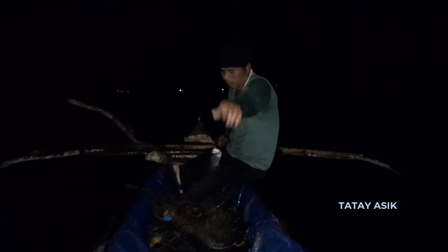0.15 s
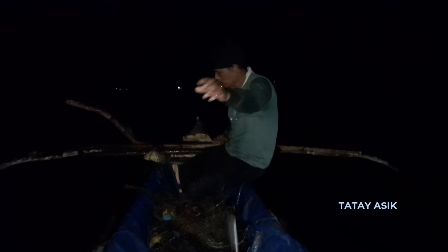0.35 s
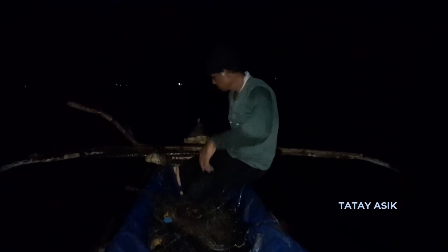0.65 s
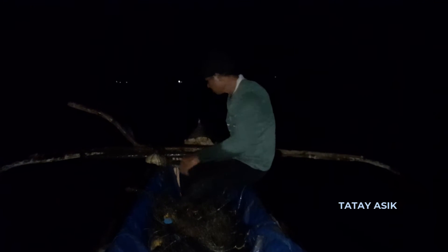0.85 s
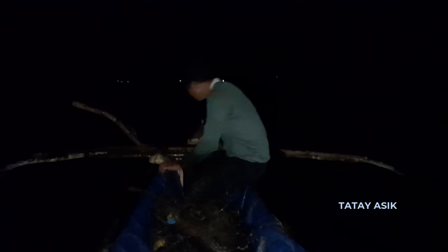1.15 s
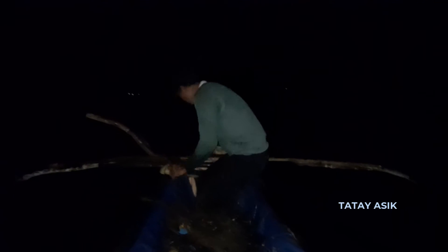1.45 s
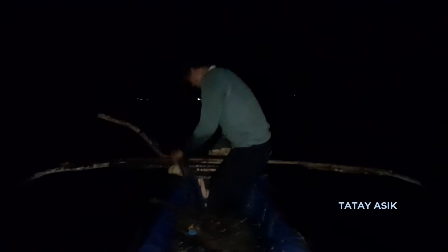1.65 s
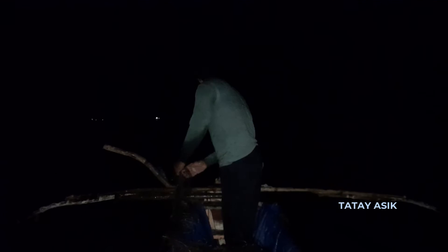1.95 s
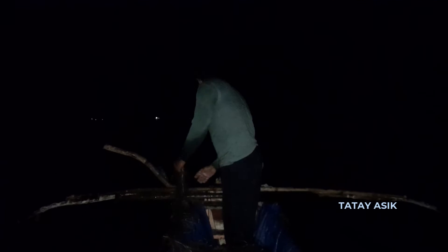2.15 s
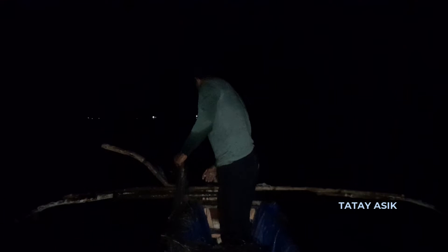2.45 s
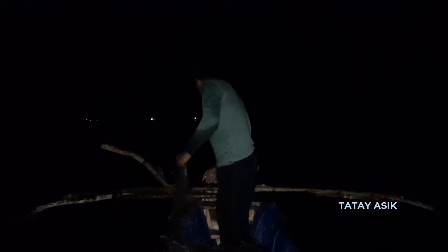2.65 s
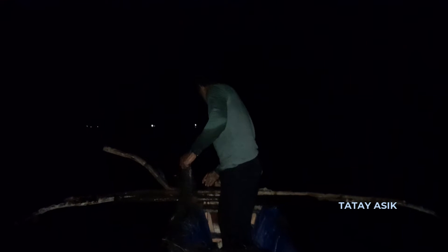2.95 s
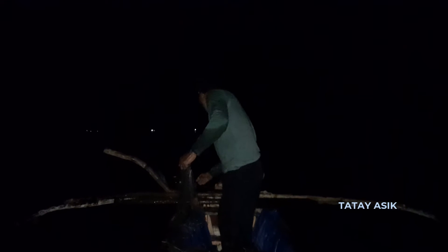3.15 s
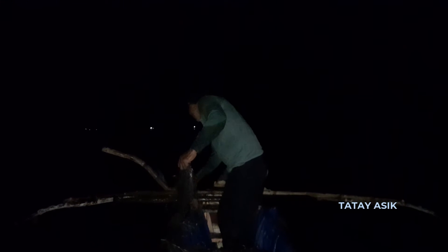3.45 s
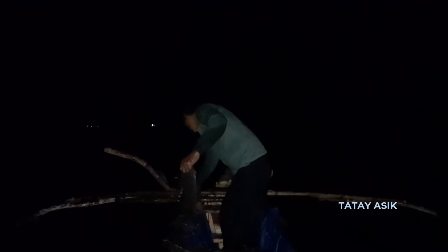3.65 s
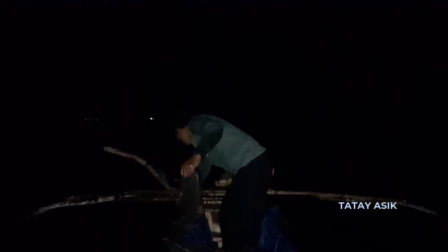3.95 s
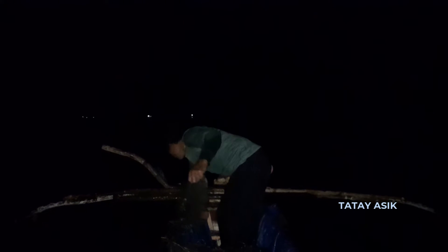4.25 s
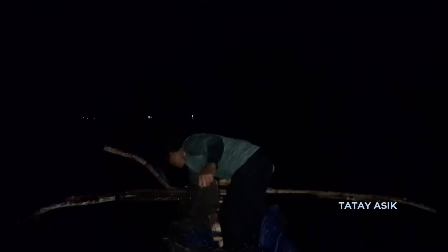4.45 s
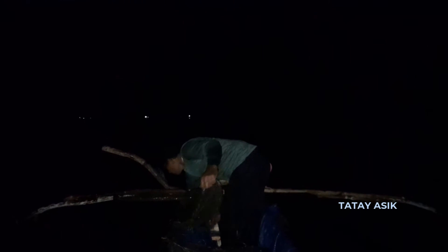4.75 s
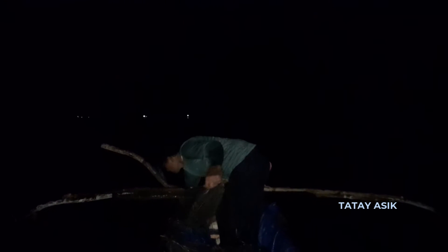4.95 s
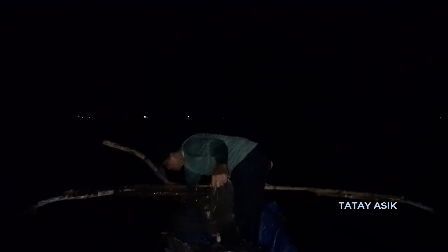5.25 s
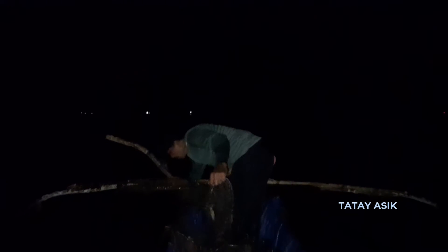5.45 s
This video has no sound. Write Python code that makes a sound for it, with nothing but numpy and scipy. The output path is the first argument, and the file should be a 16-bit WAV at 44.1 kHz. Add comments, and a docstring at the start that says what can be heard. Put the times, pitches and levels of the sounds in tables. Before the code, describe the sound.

A thrown object slaps the water early on, throwing spray and ringing bubbles, with a hard little knock on wood and a second slap soon after. Low breeze buffets the left side, then drops away. Drops tick on planks, a wet net slides faintly, and late waves slosh and gurgle against the hollow hull. Open outdoor sea, dry and near, with soft background noise.

```python
"""Small outrigger boat at night

Close on board, two microphone ports hear a splash: noise-burst slaps, low sine thumps, a rising plop, spray.
A wet net is drawn in: filtered patter hisses and short noise ticks drip on the planks.
Small waves slosh under the hull as patter whose colour shifts; small bubbles gurgle and the hull rings along.
At first a breeze, fluttering low noise, buffets mostly the left port; puffs and a faint rumble remain.
Behind it all lies the steady coloured noise of the open sea and microphone hiss."""
import sys
import numpy as np
from scipy import signal
from scipy.fft import rfft, irfft
from scipy.io import wavfile
from scipy.ndimage import uniform_filter1d

SR = 44100
rng = np.random.default_rng(int(sys.argv[2]) if len(sys.argv) > 2 else 0)


def inscribe(sig):
    """Save sig as 16-bit PCM at rate SR to the path in sys.argv[1].

    A 1-D sig is mono; a 2-D sig holds one channel per row.
    Samples are clipped to [-1, 1] before scaling.
    """
    pcm = np.round(np.clip(np.atleast_2d(sig).T, -1, 1) * 32767)
    wavfile.write(sys.argv[1], SR, pcm.astype(np.int16))


N = 247401
TIME = np.arange(N) / SR


def undb(db):
    """Decibels to gain."""
    return 10 ** (np.asarray(db) / 20)


def unit(x):
    """Scale to rms 1."""
    return x / np.sqrt(np.mean(x ** 2))


def curves(table):
    """Each column of a table after the time, joined by straight lines."""
    s, *columns = np.transpose(table)
    return [np.interp(TIME, s, column) for column in columns]


def fade(t, t60):
    """Exponential decay by 60 dB in t60, both in the same unit."""
    return np.exp(-np.log(1000) * t / t60)


def pan(db):
    """Gains of the left and right channel for a left minus right difference in dB."""
    return undb(np.array([db, -db]).reshape(2, -1) / 2)


def add(out, s, x):
    """Mix x in at time s."""
    i = int(s * SR)
    out[..., i:i + x.shape[-1]] += x[..., :N - i]


def colour(x, points, tilt_db=0):
    """Minimum-phase filter through (frequency [Hz], level [dB]) points, tilted per octave, of unit power gain."""
    size = 8192
    hz, db = np.transpose(points)
    octave = np.log2(np.maximum(np.arange(size // 2 + 1) * SR / size, 1))
    below = np.maximum(np.log2(hz[0]) - octave, 0)
    above = np.maximum(octave - np.log2(hz[-1]), 0)
    curve_db = np.interp(octave, np.log2(hz), db)
    gain = unit(undb(curve_db + tilt_db * octave - 20 * (below + above)))
    # Folding the cepstrum forward makes the filter causal
    cepstrum = irfft(np.log(gain))
    cepstrum[1:size // 2] *= 2
    cepstrum[size // 2 + 1:] = 0
    impulse = irfft(np.exp(rfft(cepstrum)))
    return signal.fftconvolve(x, impulse)[:len(x)]


def band(x, hz, octaves):
    """Band-pass around a centre."""
    half = 2 ** (octaves / 2)
    edges = np.clip([hz / half, hz * half], 10, SR * .48)
    return signal.sosfilt(signal.butter(2, edges, "band", fs=SR, output="sos"), x)


def even(x, span_s):
    """Take the slow chance swells out of a noise."""
    return x / np.sqrt(uniform_filter1d(x ** 2, int(span_s * SR)) + 1e-12)


def swell(s, db, rise_s, fall_s):
    """Gain that grows to a crest at time s and dies away."""
    drop_db, roundness = 18.5, 1.43  # drop at the ends of rise and fall; 1 = pointed crest, 2 = round
    away = np.maximum((s - TIME) / rise_s, (TIME - s) / fall_s)
    return undb(db - np.minimum(drop_db * away ** roundness, 200))


def swells(table, rest_db=-120):
    """Joint gain of several swells over a resting level, summed as powers."""
    return np.sqrt(undb(rest_db) ** 2 + sum(swell(*row) ** 2 for row in table))


def patter(rate, spread_db):
    """Random tiny impacts per second; a few stand out, larger for a positive spread, smaller for a negative."""
    size = undb(spread_db * np.minimum(rng.exponential(size=N), 4))
    hits = rng.random(N) < rate / SR
    return unit(hits * size * rng.choice([-1, 1], N))


def fizz(low_hz, high_hz, count, spread_db, cycles):
    """A cloud of small bubbles, each with its own size, ringing a few cycles with a slight rise."""
    out = np.zeros(N)
    for when, place, luck in rng.random((count, 3)):
        hz = low_hz * (high_hz / low_hz) ** place
        turns = TIME[:int(cycles / hz * SR)] * hz
        size = undb(-spread_db * np.log(max(luck, np.exp(-4))))  # a few are much larger than the rest
        ring = np.sin(2 * np.pi * turns * (1 + 0.12 * turns / cycles)) * fade(turns, cycles)
        add(out, when * N / SR, size * np.sqrt(hz) * ring)
    return unit(out)


# Wet slaps, first of the thrown thing on the water, later of the net; body and longer tail, the tail level
# relative to the body: # (time [s], level [dB], t60 [s], tail level [dB], tail t60 [s], tilt [dB/octave])
SLAP_HITS = [(0.6728, -26, 0.01, -6, 0.14, 0.5), (0.6735, -38, 0.03, -21.5, 0.24, 5),
             (0.8659, -40.5, 0.042, -9, .12, -0.5), (0.9256, -42, 0.013, -11, 0.056, 6),
             (1.3519, -44.5, 0.036, -32, 0.04, -2), (1.3575, -44, 0.015, 6, 0.061, -5.5),
             (1.368, -36.5, 0.02, -12, 0.071, 1.5)]
# Spectrum of a slap: (frequency [Hz], level [dB])
SLAP_SPECTRUM = [(350, -3), (650, -4.5), (1100, -22.5), (1600, -6), (2400, -17), (3500, -17), (5300, -14),
                 (6700, -8.5), (8300, -18.5), (10000, -14.5), (13000, -17), (15500, -15.5)]


def slaps(peak_db=8, peak_t60=0.00041, scattered=0.75):
    """A hard first contact cracks the surface, then a sheet of fine spray scatters to both ports."""
    out, t = np.zeros((2, N)), TIME[:SR // 3]
    share = scattered * (1 - fade(t, 0.0048))  # share of power that differs between the ports
    for s, db, t60, tail_db, tail_t60, tilt_db in SLAP_HITS:
        crack = undb(peak_db) * fade(t, peak_t60)
        shape = crack + fade(t, t60) + undb(tail_db) * fade(t, tail_t60)
        common = np.sqrt(1 - share) * rng.standard_normal(len(t))
        noise = common + np.sqrt(share) * rng.standard_normal((2, len(t)))
        slap = np.array([colour(port * shape, SLAP_SPECTRUM, tilt_db) for port in noise])
        add(out, s, undb(db) * slap)
    return out


# Hollow thumps of pushed water: (time [s], pitch [Hz], level [dB])
WATER_THUMPS = [(0.6735, 660, -27.5), (0.677, 339, -21), (0.690, 307, -23.5), (0.692, 167, -23),
                (0.703, 93.3, -26), (0.834, 271.6, -37.5), (1.332, 183, -34), (1.366, 305, -40),
                (1.37, 183.6, -31.5)]


def thumps():
    """Large pockets of water and air swing a few times: decaying sines with a soft onset."""
    swell_cycles, t60_cycles = 0.62, 15.6
    out, t = np.zeros(N), TIME[:SR // 3]
    for s, hz, db in WATER_THUMPS:
        turns = hz * t
        shape = (1 - np.exp(-turns / swell_cycles)) * fade(turns, t60_cycles)
        add(out, s, undb(db) * shape * np.sin(2 * np.pi * turns))
    return out


def bubble(hz, db, t60, double_s, attack_s=.0006, waver=0.034, splash_db=-7, splash_t60=0.018):
    """A trapped bubble is born in a little splash and rings, its pitch climbing as it nears the surface."""
    t = TIME[:SR // 6]
    wobble = unit(band(rng.standard_normal(len(t)), 100, 1.6))
    pitch = hz * np.minimum(1 + (t / double_s) ** 2, 3) * (1 + waver * wobble)
    ring = np.sin(2 * np.pi * np.cumsum(pitch) / SR) * fade(t, t60) * (1 - np.exp(-t / attack_s))
    splash = unit(band(rng.standard_normal(len(t)), hz, 0.98)) * fade(t, splash_t60)
    # Left minus right within the water layer: small bubbles sound further right
    side_db = 2 - 2.5 * np.log2(hz / 1000)
    return undb(db) * pan(side_db) * (ring + undb(splash_db) * splash)


# The cavity closes in a deep plop, and its remnant whoops upward:
# (time [s], pitch at birth [Hz], level [dB], t60 [s], time for the pitch to double [s])
CAVITY_PLOPS = [(0.8369, 537, -18.5, .026, 0.056), (0.857, 608, -37.5, .15, .025)]
# Drops that trap a ringing air bubble: (time [s], pitch at birth [Hz], level [dB], t60 [s])
DROP_BUBBLES = [(0.7618, 4630, -36.5, .017), (0.799, 2250, -30, .016), (0.8069, 1760, -33, 0.022),
                (0.809, 2500, -32, 0.021), (0.8377, 1025, -34, 0.082), (0.8525, 2590, -27.5, 0.023),
                (0.862, 1723, -28.5, 0.049), (0.885, 3040, -28.5, 0.0055), (0.8911, 1620, -32, 0.042),
                (0.924, 2070, -30.5, 0.026), (0.979, 1600, -36, 0.032), (0.996, 2940, -28.5, 0.017),
                (1.022, 4980, -37.5, 0.012), (1.047, 1148, -53.5, 0.2), (1.103, 1200, -37.5, 0.01),
                (1.149, 1350, -47, 0.037), (1.199, 2510, -42.5, 0.017), (1.239, 1500, -39, 0.039),
                (1.3126, 2600, -47.5, 0.051), (1.3564, 1419, -27.5, 0.046), (1.357, 3213, -23, 0.018),
                (2.011, 720, -41.5, 0.035), (2.11, 1630, -54.5, 0.043), (2.155, 980, -59.5, .12),
                (2.229, 1990, -66.5, 0.067), (2.376, 1610, -59.5, 0.074), (2.595, 984, -63, 0.045),
                (2.683, 930, -68.5, 0.18), (3.129, 2334, -62, .09), (3.9233, 894, -57.5, 0.19),
                (4.0236, 1523, -51.5, 0.056), (4.386, 1930, -66, 0.094), (4.419, 2365, -63, 0.062),
                (4.826, 1710, -46, 0.037), (4.918, 1217, -62.5, .11), (5.296, 994, -59, 0.14),
                (5.53, 884, -57.5, .04)]


def bubbles():
    """The plop of the cavity and the plinks of single drops; the shorter a plink, the faster it climbs."""
    out = np.zeros((2, N))
    for s, hz, db, t60, double_s in CAVITY_PLOPS:
        add(out, s, bubble(hz, db, t60, double_s, splash_db=-14))
    for s, hz, db, t60 in DROP_BUBBLES:
        add(out, s, bubble(hz, db, t60, double_s=t60))
    return out


# Showers of falling spray: (crest time [s], level [dB], rise [s], fall [s])
SPRAY_SHOWERS = [(0.70, -52, 0.03, 0.17), (0.88, -46, 0.088, 0.23), (1.36, -62, 0.89, 0.28),
                 (1.72, -72.5, 0.15, 0.15)]
# Spectrum of the spray: (frequency [Hz], level [dB])
SPRAY_SPECTRUM = [(700, -6), (1500, -4.5), (2800, -5), (4200, -4), (6800, -2), (8500, -14.5), (12500, -5),
                  (15500, -7.5)]


def spray(tick_db=-2, mist_db=-8, aside_db=-5):
    """Droplets land with ticks and tiny ringing bubbles in a mist of finer ones; some fall near one port only."""
    drops = fizz(1330, 9270, count=3000, spread_db=3.5, cycles=43)
    drops = drops + undb(tick_db) * patter(rate=400, spread_db=5.0)
    ports = []
    for _ in range(2):
        mist = undb(mist_db) * rng.standard_normal(N)
        aside = undb(aside_db) * patter(rate=270, spread_db=-2)
        ports.append(even(colour(drops + mist + aside, SPRAY_SPECTRUM), 0.044))
    return np.array(ports) * swells(SPRAY_SHOWERS, rest_db=-85)  # the wet net never stops dripping


def strays(count):
    """Chance drops plink between the first and last shower, their level following the falling spray."""
    centre_hz, spread_octaves = 2390, 0.78
    over_shower_db, spread_db, t60_cycles = 4, 3.5, 50
    out, shower = np.zeros((2, N)), swells(SPRAY_SHOWERS)
    times = rng.uniform(SPRAY_SHOWERS[0][0], SPRAY_SHOWERS[-1][0], count)
    for when, (pitch, size) in zip(times, rng.standard_normal((count, 2))):
        hz = centre_hz * 2 ** (spread_octaves * np.clip(pitch, -2, 2))
        db = over_shower_db + spread_db * np.clip(size, -1.5, 1.5)
        t60 = t60_cycles / hz
        add(out, when, shower[int(when * SR)] * bubble(hz, db, t60, double_s=t60))
    return out


# Pulls that slide the net over the side: (crest time [s], level [dB], rise [s], fall [s])
NET_PULLS = [(1.55, -74, .35, 0.9), (2.03, -80, 0.2, 0.089), (4.28, -71.5, 1, 0.98),
             (5.25, -69.5, 0.25, 0.36)]
# Spectrum of the net's hiss: (frequency [Hz], level [dB])
NET_SPECTRUM = [(2000, -9), (3000, -7), (3800, -9.5), (5000, -5), (6700, 0.5), (8300, -9), (11000, -7.5),
                (14000, -10), (15800, -5.5)]


def net(rate=12000, spread_db=-3.0):
    """Countless wet meshes slip over the side in a fine hiss that swells with each pull."""
    hiss = np.array([unit(colour(patter(rate, spread_db), NET_SPECTRUM)) for _ in range(2)])
    return hiss * swells(NET_PULLS, rest_db=-91)


def tap(db, hz, t60, octaves, splat_db):
    """A short coloured tick with a broad splat."""
    t = TIME[:SR // 10]
    noise = rng.standard_normal(len(t))
    return undb(db) * fade(t, t60) * (unit(band(noise, hz, octaves)) + undb(splat_db) * noise)


# Drops ticking on net and planks: (time [s], level [dB])
DROP_TICKS = [(0.562, -70), (0.756, -42), (0.836, -39.5), (0.967, -36.5), (1.02, -45.5), (1.094, -38),
              (1.149, -46), (1.233, -49), (1.255, -45), (1.468, -40.5), (1.783, -50), (2.09, -65.5),
              (2.562, -59.5), (2.759, -56.5), (3.118, -64.5), (3.713, -57), (3.926, -58), (4.039, -56.5),
              (4.787, -54), (4.795, -58), (5.047, -61)]
# Light knocks of the gear on the planks: (time [s], level [dB], centre [Hz], t60 [s])
PLANK_KNOCKS = [(0.926, -25, 2500, .004), (1.904, -54, 1390, 0.0058), (3.37, -62, 1750, 0.05),
                (3.711, -64.5, 1100, 0.12)]


def ticks(centre_hz=6014, t60_s=0.025, scatter_octaves=.08):
    """Drops burst on something solid, all much alike; now and then the gear knocks on a plank."""
    out = np.zeros(N)
    for s, db in DROP_TICKS:
        hz = centre_hz * 2 ** (scatter_octaves * rng.standard_normal())
        add(out, s, tap(db, hz, t60_s, octaves=0.58, splat_db=-7))
    for s, db, hz, t60 in PLANK_KNOCKS:
        add(out, s, tap(db, hz, t60, octaves=1.0, splat_db=-8))
    return out


# Waves washing along the hull: (crest time [s], level [dB], rise [s], fall [s], tilt at crest [dB/octave])
HULL_WAVES = [(0.72, -47, 0.058, 0.21, -5), (1.1, -65.5, 0.34, 0.49, 1.5), (1.385, -44, 0.087, 0.064, -6.5),
              (1.68, -65.5, 0.31, 0.26, 4), (2.021, -62.5, 0.053, 0.13, -2), (3.421, -76, .25, 0.66, -0.5),
              (4.788, -43.5, 0.068, 0.074, .5), (5.03, -57.5, 0.052, 0.063, -1),
              (5.158, -44, 0.083, 0.12, -1), (5.35, -64.5, 0.28, 0.32, 10)]
# Spectrum of the churned water before its tilt: (frequency [Hz], level [dB])
WASH_SPECTRUM = [(100, -15), (165, 3), (226, 1), (310, 0), (470, -8), (600, -6), (780, -15), (1150, -26.5),
                 (1450, -24), (2300, -31), (3100, -36), (3800, -44), (7000, -61)]


def wash(rate=9000, spread_db=1.5, pivot_hz=400):
    """Churned water under the hull: bright as a wave meets it, darker as the air pocket grows."""
    lapping_db, lapping_tilt_db = -82, 1.5  # the water between waves; tilt per octave
    darkens_db = 3.5  # tilt per octave lost from a wave's front to its crest, and again to its back
    power = undb(lapping_db) ** 2
    tilts = power * lapping_tilt_db
    for s, db, rise_s, fall_s, crest_tilt_db in HULL_WAVES:
        wave = swell(s, db, rise_s, fall_s) ** 2
        phase = np.interp(TIME, [s - rise_s, s, s + fall_s], [1, 0, -1])
        power = power + wave
        tilts = tilts + wave * (crest_tilt_db + darkens_db * phase)
    tilt_db = tilts / power  # the loudest wave sets the colour
    spectrum = rfft(colour(patter(rate, spread_db), WASH_SPECTRUM))
    octave = np.log2(np.maximum(np.fft.rfftfreq(N, 1 / SR), 1) / pivot_hz)
    out = np.zeros(N)
    for k in range(-3, 6):  # overlapping octave bands, each with its own moving gain
        octave_band = irfft(spectrum * np.maximum(1 - abs(octave - k), 0), N)
        out += octave_band * undb(k * tilt_db)
    return even(out, 0.097) * np.sqrt(power)


# Gurgles of small bubbles in the churned water: (crest time [s], level [dB], rise [s], fall [s])
WATER_GURGLES = [(0.79, -48, 0.014, 0.05), (1.25, -67.5, 0.32, 0.53), (1.74, -67, 0.39, 0.093),
                 (2.018, -63, 0.071, 0.1), (2.26, -75, 0.11, 0.15), (3.39, -74, 0.028, 0.14),
                 (3.72, -69, 0.074, 0.051), (4.742, -57, 0.022, 0.12), (5.16, -59, 0.063, 0.19),
                 (5.42, -83.5, .2, 0.41)]
# Spectrum of the gurgles before their tilt: (frequency [Hz], level [dB])
GURGLE_SPECTRUM = [(450, 3), (700, 4.5), (1100, -2), (1700, -5.5), (2600, -9.5), (4200, -22.5)]


def gurgles():
    """Churned water gurgles with larger bubbles."""
    gurgle = fizz(531, 4420, count=6000, spread_db=2.0, cycles=8.9)
    gurgle = even(colour(gurgle, GURGLE_SPECTRUM, tilt_db=4.0), 0.052)
    return gurgle * swells(WATER_GURGLES, rest_db=-92)


# Resonances of the hollow hull: (frequency [Hz], width [Hz], level [dB])
HULL_MODES = [(245, 25, -3.5), (580.5, 36, -5.5), (978, 130, 0)]


def hull(x):
    """The hollow hull rings along with the water around it."""
    ringing = 0
    for hz, width_hz, db in HULL_MODES:
        ringing = ringing + undb(db) * signal.lfilter(*signal.iirpeak(hz, hz / width_hz, fs=SR), x)
    return x + ringing


def boat(x, scatter_db, t60, scatter_hz, lag):
    """Direct sound reaches the left port lag samples early; planks and outriggers briefly scatter its treble."""
    x, t = np.broadcast_to(x, (2, N)), TIME[:SR // 8]
    echoes = rng.standard_normal((2, len(t))) * fade(t, t60)
    echoes /= np.sqrt(np.sum(echoes ** 2, axis=1, keepdims=True))
    echoes = signal.sosfilt(signal.butter(1, scatter_hz, "high", fs=SR, output="sos"), echoes)
    direct = np.array([x[0], np.roll(x[1], int(lag))])
    scattered = undb(scatter_db) * signal.fftconvolve(x, echoes, axes=1)[:, :N]
    return (direct + scattered) / np.hypot(1, undb(scatter_db) / 2)


# Course of the low-frequency rumble at the ports, joined by lines, level before the function's gain:
# (time [s], level [dB], left minus right [dB])
BREEZE_LEVEL = [(0.0, -45.5, 29.0), (0.274, -52, 36), (0.324, -58, -4), (0.44, -43.5, 23),
                (0.534, -49.5, 15), (0.628, -38, 33.5), (0.672, -69, 8), (0.704, -42.5, 8.5),
                (0.826, -46.5, 20), (1.058, -51, 9.5), (1.108, -42.5, 40), (1.14, -52, 7), (1.256, -48, 33),
                (1.366, -43.5, -4), (1.548, -49, 18.5), (1.604, -43.5, 42), (1.802, -50.5, 10.0),
                (1.98, -64, 7.5)]
# Spectrum of the eddies at a port: (frequency [Hz], level [dB])
BREEZE_SPECTRUM = [(13, -40.5), (22, -5.5), (54, 2), (96, 0.5), (121, -3), (167, -18.5), (325, -31.5),
                   (360, -38.5), (392, -43), (532, -45.5), (700, -48), (910, -69), (1540, -120)]
# Stray puffs on the left port once the breeze has dropped: (time [s], level [dB])
STRAY_PUFFS = [(2.456, -59), (3.32, -57), (3.522, -52), (4.399, -61.5), (4.812, -55.5), (5.44, -56.5)]


def breeze(gain_db=4.5):
    """Eddies buffet each microphone port on its own; the breeze drops to stray puffs over a faint rumble."""
    dies_db_per_s = 51
    flutter_hz, flutter_db = 13, 2  # flutter of the breeze, puffs and rumble
    puff_rise_s, puff_fall_s = 0.068, 0.12
    calm_db, rumble_db = -72.5, -72.5  # air on the left port between puffs; faint low rumble on both
    db, pan_db = curves(BREEZE_LEVEL)
    db = db - dies_db_per_s * np.maximum(TIME - BREEZE_LEVEL[-1][0], 0)
    knots = np.arange(0, N / SR + 1, 1 / (2 * flutter_hz))
    depths = np.clip(rng.standard_normal(len(knots)), -2, 1)
    flutter = unit(undb(flutter_db * np.interp(TIME, knots, depths)))
    eddies = [even(colour(rng.standard_normal(N), BREEZE_SPECTRUM), 0.043) for _ in range(2)]
    ports = pan(pan_db)
    left, right = undb(db + gain_db) * ports / np.sqrt(np.mean(ports ** 2, axis=0))
    puffs = swells([(s, puff_db, puff_rise_s, puff_fall_s) for s, puff_db in STRAY_PUFFS], rest_db=calm_db)
    gains = np.hypot([np.hypot(left, puffs), right], undb(rumble_db))
    return flutter * np.array(eddies) * gains


# Spectrum of the night behind the boat: (frequency [Hz], level [dB])
NIGHT_SPECTRUM = [(150, 4.5), (300, 0), (500, -5), (1000, -12), (2000, -23.5), (4000, -25.5), (5600, -25.5),
                  (6800, -19), (8300, -24), (13500, -21), (15800, -22)]


def night(level_db=-71.5):
    """Faint open sea and microphone hiss: steady coloured noise, separate at each port."""
    ports = [unit(colour(rng.standard_normal(N), NIGHT_SPECTRUM)) for _ in range(2)]
    return undb(level_db) * np.array(ports)


def scene():
    """Water sounds around the boat, the net, the breeze and the quiet night."""
    port_lag = 4  # samples
    ahead = boat(hull(slaps()), scatter_db=-6, t60=.015, scatter_hz=900, lag=0)
    drops = boat(ticks() + spray(), scatter_db=-5, t60=.01, scatter_hz=900, lag=port_lag)
    water = hull(bubbles() + strays(count=45) + thumps() + gurgles() + wash())
    water = boat(water, scatter_db=-3, t60=.035, scatter_hz=500, lag=port_lag)
    near = undb(1.0) * ahead + undb(-0.28) * drops + water * pan(-1.6)
    return near + net() + breeze() + night()


def record(dry, left_hz=12500, left_db=-8, right_hz=5200, right_db=-6):
    """Each microphone port has its own resonance; the recorder cuts the deepest bass and the top."""
    left, right = dry
    left = left + undb(left_db) * band(left, left_hz, 0.41)
    right = right + undb(right_db) * band(right, right_hz, .6)
    ports = np.array([left, right])
    ports = signal.sosfilt(signal.butter(4, 40, "high", fs=SR, output="sos"), ports)
    return signal.sosfilt(signal.ellip(10, .2, 70, 16000, fs=SR, output="sos"), ports)


dry = scene()
out = record(dry)
inscribe(out)
```